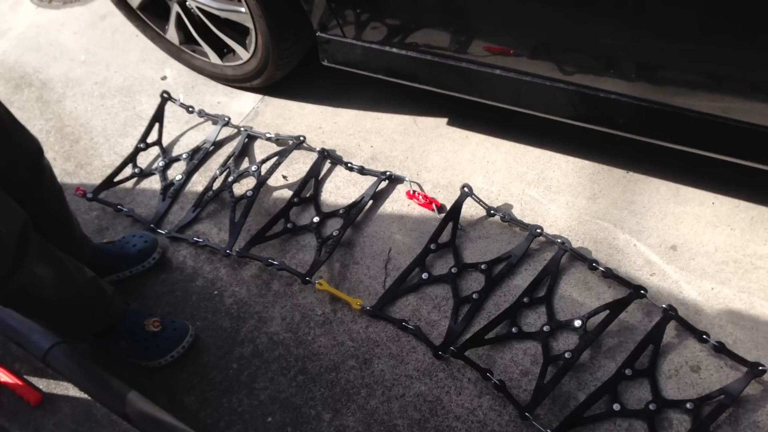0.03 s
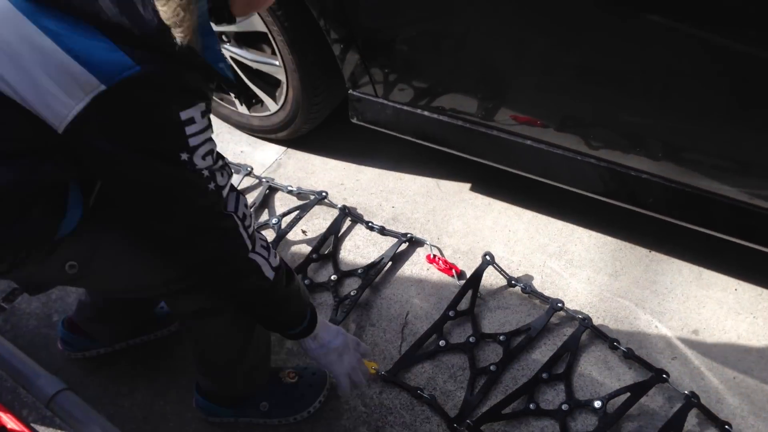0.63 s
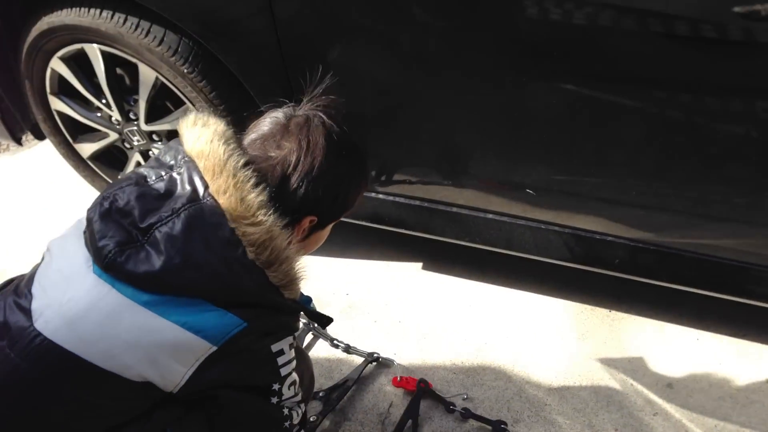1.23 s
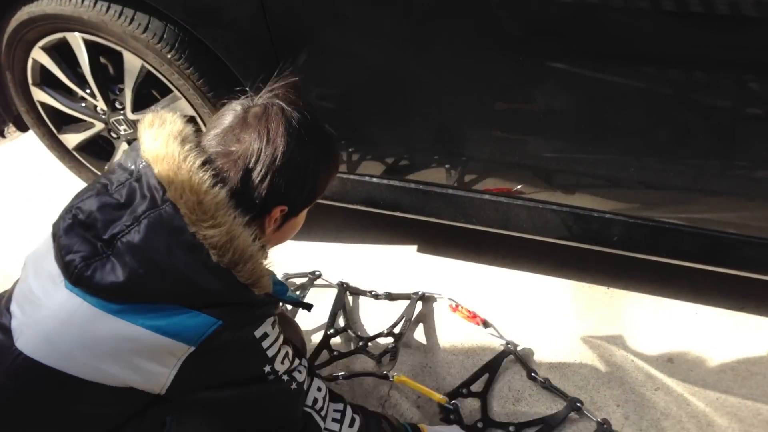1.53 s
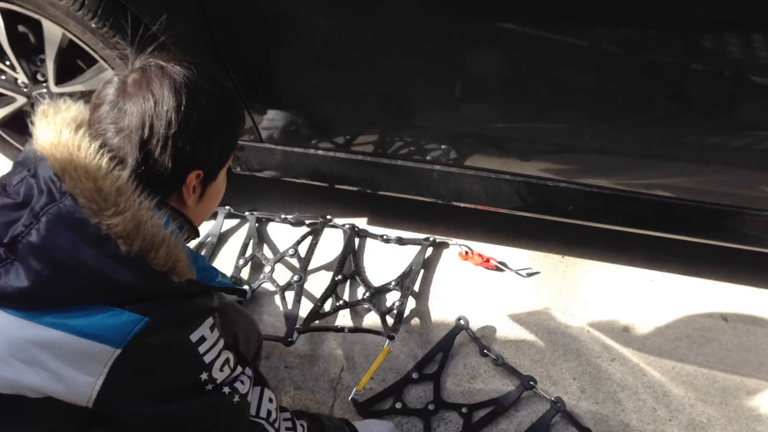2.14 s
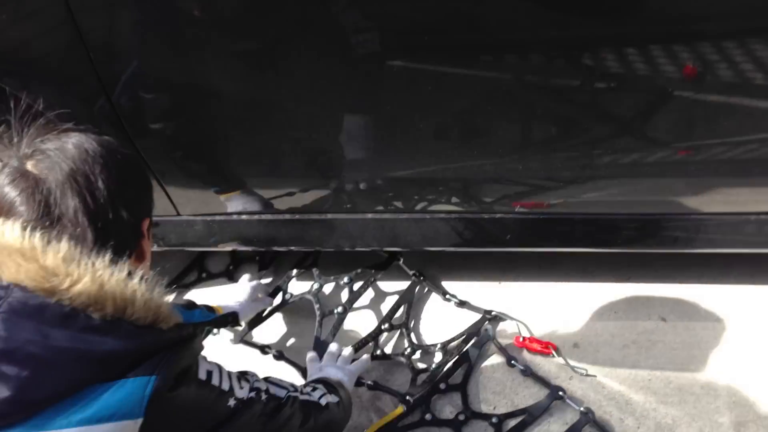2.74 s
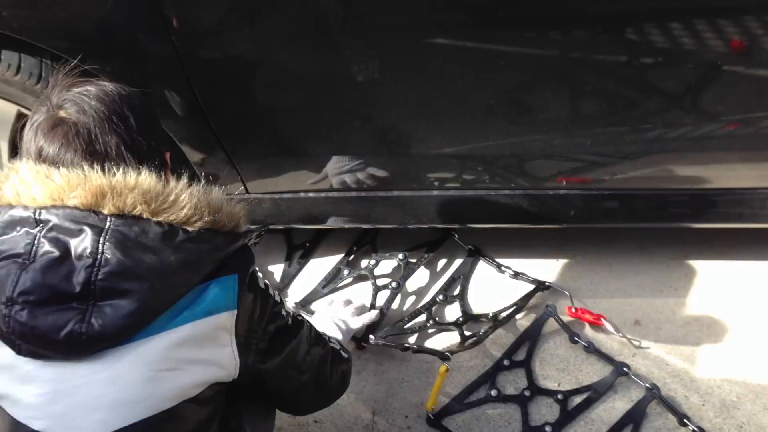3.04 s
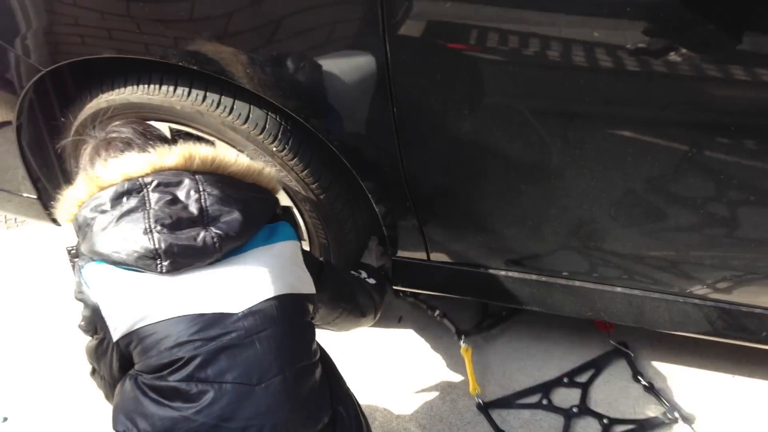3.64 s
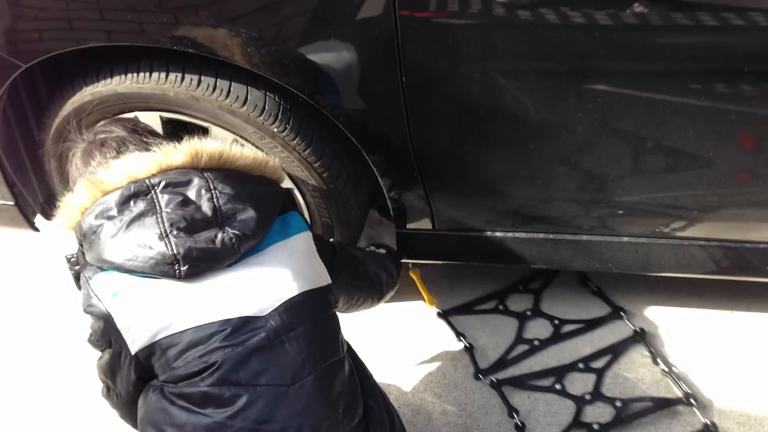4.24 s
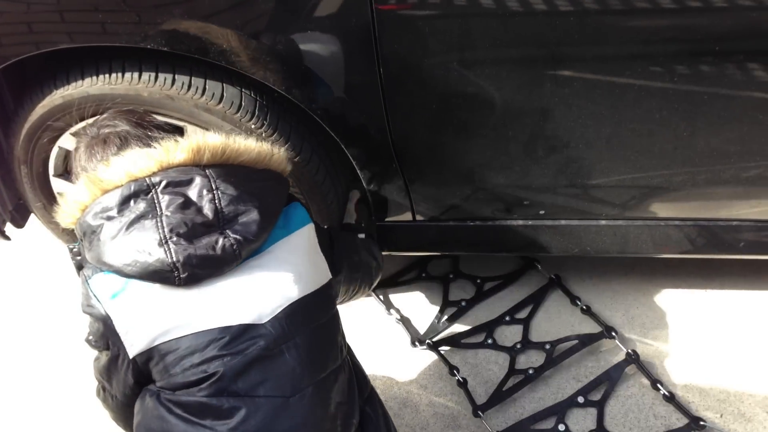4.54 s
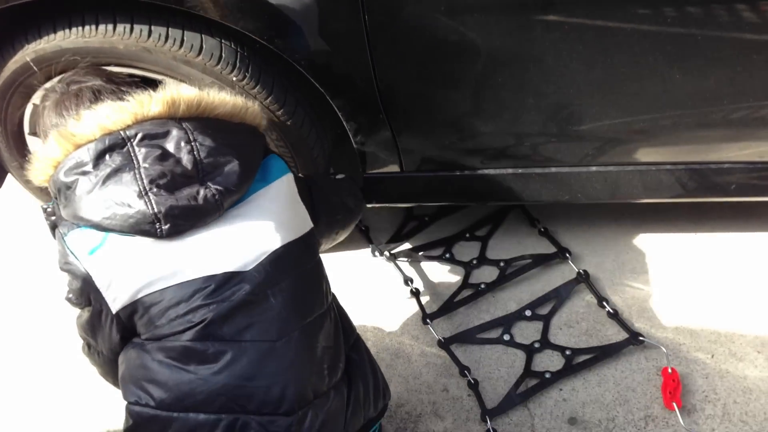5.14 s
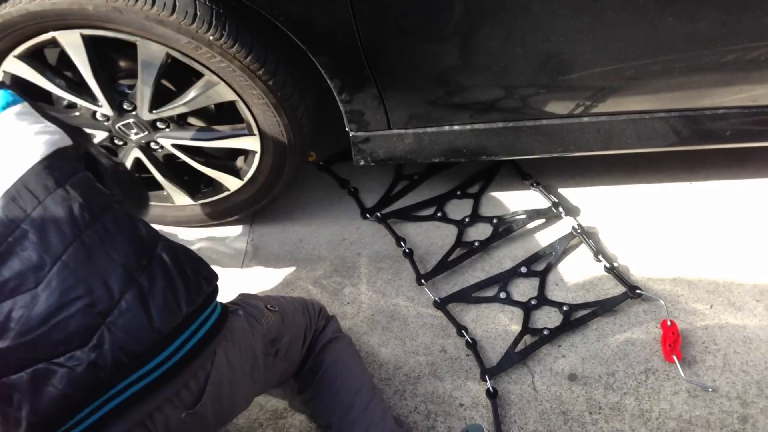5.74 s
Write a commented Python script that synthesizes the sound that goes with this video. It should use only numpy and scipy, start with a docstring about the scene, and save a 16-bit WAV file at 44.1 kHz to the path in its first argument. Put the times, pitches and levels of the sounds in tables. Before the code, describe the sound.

A net-type tyre chain is tugged over pavement beside a parked car, scraping, clinking and jingling in short, irregular bursts outdoors.

```python
"""Outdoors, a net-type tyre chain is fed behind the wheel of a parked car. First the handler steps,
crouches and rustles in a padded jacket while a low hum fades. From about 1 s the net is pulled over the
pavement in short tugs: studs grind and snap off grit, links clink and sing, steel hooks ring. After 5 s
the pulling stops, leaving a last snap, a scuff and the street's hush. Throughout, the ground and the
car's side throw the handling sounds back."""
import sys
import numpy as np
from scipy import signal
from scipy.fft import rfft, irfft
from scipy.io import wavfile

SR = 44100
rng = np.random.default_rng(int(sys.argv[2]) if len(sys.argv) > 2 else 0)


def log_audio(samples):
    """Write samples as a 16-bit WAV file to the path given in sys.argv[1]."""
    # one column per channel
    frames = np.atleast_2d(samples).T
    # limit to full scale, then quantise
    limited = np.clip(frames, -1, 1)
    pcm = np.round(limited * 32767).astype(np.int16)
    wavfile.write(sys.argv[1], SR, pcm)


N = 260190
TIME = np.arange(N) / SR

# EQ of the studs' bright scrape and of their low grind: f/Hz, level/dB
SCRAPE_EQ = [(500, -50), (1500, -7.5), (2250, -4.5), (2600, 3), (3400, -2), (4400, 1.5), (5500, 1.5),
             (7000, -3), (8300, -6), (10500, -9.5), (12500, -13), (15500, -27)]
GRIND_EQ = [(60, -53), (150, -17), (420, -7.5), (700, 3.5), (1200, 1), (1850, 4), (2400, -1.5),
            (4000, -31.5), (12000, -14)]
def drag():
    """Studs catch and slip on rough ground: fine grains, sharp grit, a coarser grind, rattling links."""
    t = np.arange(SR // 20) / SR
    slip = judder(hz=70, depth_db=2.1)
    grit = gain_of(-3.5) * grains(per_s=150, spread_db=1.5)
    scrape = unit_rms(colour(grains(per_s=8200, spread_db=2.5) + grit, SCRAPE_EQ))
    grind = unit_rms(colour(grains(per_s=6000, spread_db=3.5), GRIND_EQ))
    clinks = [link_clink(t, hz) for hz in np.geomspace(2600, 7200, 90)]
    rattle = scatter(clinks, per_s=190, spread_db=1.8)
    scrape_gain, grind_gain, rattle_gain = (pull_envelope(layer) for layer in range(3))
    return slip * (scrape_gain * scrape + grind_gain * grind) + rattle_gain * rattle


# tugs that slide the net: t/s, length/s, scrape level/dB, grind level/dB, rattle level/dB
PULLS = [(0.996, 0.21, -53, -60, -52), (1.139, 0.15, -45.5, -60.5, -43.5), (1.325, 0.16, -43.5, -64, -44),
         (1.424, 0.16, -43.5, -49.5, -44.5), (1.551, 0.097, -37.5, -47, -47),
         (1.674, 0.15, -48.5, -56.5, -67), (1.844, 0.054, -49.5, -54.5, -49),
         (1.925, 0.06, -51.5, -58, -55.5), (2.005, 0.12, -57, -54.5, -53.5), (2.08, 0.19, -51, -55.5, -52),
         (2.183, 0.13, -42.5, -50, -41), (2.305, 0.17, -53, -59, -55.5), (2.503, 0.27, -51.5, -60.5, -53.5),
         (2.802, 0.26, -55, -60, -61), (3.111, 0.068, -46, -60.5, -50.5), (3.202, 0.061, -55.5, -63, -53),
         (3.277, 0.443, -48, -54, -56.5), (3.491, 0.26, -45.5, -56.5, -63),
         (3.72, 0.15, -54.5, -58.5, -54.5), (4.138, 0.085, -61, -58.5, -56.5),
         (4.188, 0.29, -47, -56.5, -60), (4.519, 0.16, -55.5, -59, -54.5), (4.904, 0.27, -59, -56.5, -55.5),
         (5.243, 0.07, -67, -64, -63)]
def pull_envelope(layer, attack_s=0.026, release_s=0.025, swell_db=2):
    """Gain of one drag layer: each pull takes up, swells and slides to rest; overlaps add in power."""
    power, t = np.zeros(N), np.arange(SR * 3 // 4) / SR
    for start, length, *layer_db in PULLS:
        take_up = np.minimum(t / attack_s, 1)
        arch = np.sin(np.pi * np.minimum(t / length, 1)) - 2 / np.pi
        release = np.exp(-np.maximum(t - length, 0) / release_s)
        add(power, start, (gain_of(layer_db[layer] + swell_db * arch) * take_up * release) ** 2)
    return np.sqrt(power)


# modes of a link, damped by the rubber net: f/Hz, level/dB, t60/s
LINK_MODES = [(1985, -9, 0.016), (2654, 5, 0.032), (2810, 2.5, 0.024), (3290, 2.5, 0.014),
              (3494, 5.5, 0.02), (3820, 6, 0.012), (4297, 5.5, 0.023), (4880, -1.5, 0.012),
              (5950, -5.5, 0.035), (6600, -9.5, 0.033), (7020, -4, 0.026)]
def link_clink(t, hz, detune=0.019, fall_db_per_octave=9.5, note_t60_cycles=66):
    """One clink: a main note, longer when low, over the link's modes, which fall away from that note."""
    f, db, t60 = np.transpose(LINK_MODES)[:, :, None]
    tune, strength, phase = rng.standard_normal((3, len(LINK_MODES), 1))
    struck_db = db + 2.4 * strength - fall_db_per_octave * abs(np.log2(f / hz))
    own_hz = f * (1 + detune * tune)
    modes = gain_of(struck_db - 60 * t / t60) * np.sin(2 * np.pi * (own_hz * t + phase))
    note = np.sin(2 * np.pi * hz * t) * gain_of(-0.5 - 60 * t * hz / note_t60_cycles)
    return modes.sum(0) / np.linalg.norm(gain_of(struck_db)) + note


# EQ on the chain's hard hits, clacks and snaps alike: f/Hz, level/dB
IMPACT_EQ = [(200, -34), (1000, -6.5), (1900, 6.5), (2250, -8), (2600, -2.5), (7200, 0.5), (8300, -5.5),
             (10000, -4), (12200, -9), (14300, -1)]
# links hitting the ground and each other: t/s, pre-EQ level/dB, main note f/Hz
CLACKS = [(1.0586, -33.5, 3520), (1.1731, -30, 3640), (1.1884, -33, 6900), (1.24, -32, 2910),
          (1.2468, -29.5, 7050), (1.259, -32, 3100), (1.283, -35, 2760), (1.317, -32, 3970),
          (1.3406, -28.5, 5940), (1.345, -27, 4550), (1.393, -32.5, 3420), (1.4491, -30, 3580),
          (1.62, -33, 5700), (1.635, -33.5, 4930), (1.6828, -31.5, 2860), (1.705, -32, 2670),
          (1.7292, -30.5, 2760), (1.7445, -33.5, 2750), (1.771, -46, 2920), (1.7954, -41.5, 2830),
          (1.9585, -40.5, 2105), (2.0873, -26, 3880), (2.0936, -26, 6180), (2.3806, -37, 6970),
          (2.5908, -36, 2840), (2.6185, -36.5, 4300), (2.637, -40, 4350), (2.6497, -30.5, 3320),
          (2.66, -38.5, 3480), (2.676, -33, 3560), (2.6856, -32, 3080), (2.6938, -40, 3040),
          (2.712, -34, 2950), (2.8531, -26.5, 4710), (2.917, -32, 4450), (3.35, -33.5, 3040),
          (3.3633, -42, 2970), (3.5, -30.5, 2550), (3.5368, -32.5, 4260), (3.5932, -31, 2830),
          (3.622, -29, 4360), (3.6386, -32.5, 5240), (3.7138, -30, 3330), (4.2512, -30.5, 2675),
          (4.2729, -31.5, 3420), (4.33, -28, 3880), (4.351, -31, 3000), (4.381, -34, 4600),
          (4.3956, -27.5, 3840), (4.4215, -37, 4530), (4.447, -39, 4500), (4.668, -40, 4270),
          (4.9598, -40, 2880), (5.1234, -35, 3220), (5.1784, -47, 3400), (5.2182, -50.5, 3300)]
def link_clacks(body_hz=4600, rise_s=0.00072, buzz_s=0.0051, settle_t60=0.087):
    """A link rolls into contact: it clinks, buzzes briefly against the ground and settles."""
    out, t = np.zeros(N), np.arange(SR // 8) / SR
    for s, db, hz in CLACKS:
        contact = gain_of(-13) * np.exp(-(t / buzz_s) ** 2) + gain_of(-24 - 60 * t / settle_t60)
        buzz = noise_band(len(t), np.sqrt(hz * body_hz), octaves=0.74) * contact
        blow = (link_clink(t, hz) + buzz) * (1 - np.exp(-t / rise_s))
        add(out, s, gain_of(db) * blow / np.std(blow[:SR // 200]))  # the first 5 ms set the level
    return colour(out, IMPACT_EQ)


# cracks of studs on grit: t/s, pre-EQ level/dB, centre f/Hz
SNAPS = [(1.261, -20, 5060), (1.4515, -26, 4500), (1.479, -21.5, 4400), (1.4895, -20.5, 4900),
         (1.5662, -14, 4700), (1.665, -26, 4800), (2.0873, -13, 4830), (2.2687, -17.5, 4720),
         (2.275, -19, 4450), (2.3062, -19.5, 4170), (3.1072, -31.5, 4570), (3.5644, -18.5, 4800),
         (4.667, -24.5, 4300), (5.065, -34, 4800), (5.1135, -37, 9000), (5.518, -43, 4440)]
def stud_snaps(crumbs_t60=0.03):
    """A stud jumps off a grain of grit: a crack with hardly any ring and a crumbly tail."""
    out, t = np.zeros(N), np.arange(SR // 20) / SR
    for s, db, hz in SNAPS:
        crack = knock(t, hz, octaves=0.99, t60=0.0068, count=14)
        crumbs = noise_band(len(t), hz, octaves=0.7) * gain_of(-22 - 60 * t / crumbs_t60)
        add(out, s, gain_of(db) * (crack + crumbs))
    return colour(out, IMPACT_EQ)


# jolts to the steel hooks: t/s, level/dB, overtone f/Hz
HOOK_JOLTS = [(1.062, -42, 6600), (1.173, -39, 6900), (1.304, -49, 13900), (1.341, -41, 14300),
              (1.706, -43, 14000), (1.73, -43, 9260), (2.088, -44, 14350), (2.676, -47, 9330),
              (2.714, -45, 9330), (2.854, -37, 6560), (3.138, -51, 9290), (3.594, -48, 9240),
              (3.639, -37, 6510), (3.715, -37, 4260), (3.796, -44, 9130), (4.272, -43.5, 6500),
              (4.331, -37, 6580), (4.45, -42.5, 9450), (5.124, -44, 14240), (5.18, -55, 9260)]
def hook_jingle(overtone_t60=0.098, modes_db=-2.5, shake_db=-11, shake_decay_s=0.048):
    """A jolted hook sings on one overtone above its modes and sets its loose neighbours tapping."""
    t, shake_t = np.arange(SR // 4) / SR, np.arange(SR // 2) / SR
    taps = scatter([hook_ring(t, sustain=0.6) for _ in range(60)], per_s=160, spread_db=3)
    rings, shake = np.zeros((2, N))
    for s, db, hz in HOOK_JOLTS:
        overtone = np.sin(2 * np.pi * hz * t) * gain_of(-60 * t / overtone_t60)
        modes = gain_of(modes_db) * hook_ring(t, looseness=0.87)
        add(rings, s, gain_of(db) * (overtone + modes))
        add(shake, s, gain_of(db + shake_db) * np.exp(-shake_t / shake_decay_s))
    chatter = judder(hz=220, depth_db=2)  # ringing hooks buzz against the net
    return (rings + shake * taps) * chatter


# modes of a steel hook: f/Hz, level/dB, t60/s
HOOK_MODES = [(2515, 0.5, 0.046), (2800, -17, 0.19), (6500, -8, 0.17), (6740, -22, 0.041), (9600, -9, 0.2),
              (9510, -7, 0.05), (10670, -19, 0.15), (14000, -9, 0.1)]
def hook_ring(t, looseness=1, sustain=1):
    """One hook rings; no two are tuned alike, and each tap favours other modes."""
    hz, db, t60 = np.transpose(HOOK_MODES)[:, :, None]
    tune, strength = looseness * rng.standard_normal((2, len(HOOK_MODES), 1))
    own_hz = hz * (1 + 0.009 * tune)
    decay = gain_of(db + 3.5 * strength - 60 * t / (t60 * sustain))
    return (decay * np.sin(2 * np.pi * own_hz * t)).sum(0)


# EQ of skidding steel, all top end: f/Hz, level/dB
GLINT_EQ = [(6000, -45), (8600, -6), (9300, 4.5), (10700, 3.5), (12000, -7.5), (13400, -10), (14250, -8),
            (15200, -25)]
# short bright skids: t/s, level/dB
GLINTS = [(1.174, -45), (1.342, -36.5), (1.705, -35.5), (1.985, -50), (2.089, -34.5), (2.853, -37),
          (3.696, -36.5), (4.275, -41.5), (4.29, -41), (4.3265, -38), (4.417, -39.5), (5.0152, -45),
          (5.028, -50), (5.062, -41), (5.113, -40.5), (5.147, -43)]
def steel_glints(t60=0.05):
    """Steel skids on steel: a flash of friction that lights up the highest modes."""
    out, t = np.zeros(N), np.arange(SR // 12) / SR
    for s, db in GLINTS:
        skid = unit_rms(colour(rng.standard_normal(len(t)), GLINT_EQ))
        add(out, s, gain_of(db - 60 * t / t60) * skid)
    return out


# links singing as they slide on a neighbour: t/s, length/s, level/dB, start f/Hz, end f/Hz
SLIDES = [(1.19, 0.09, -47.5, 2810, 2850), (1.35, 0.115, -46, 2600, 2585), (1.58, 0.172, -45.5, 2580, 2595),
          (1.68, 0.112, -45.5, 2790, 2870), (2.565, 0.08, -52, 2840, 2830),
          (2.621, 0.024, -47.5, 4450, 4430), (2.65, 0.07, -41, 3400, 2950), (2.714, 0.05, -49, 2640, 2570),
          (4.335, 0.048, -45, 6600, 6650)]
def link_slides(mode_width_hz=29, edge_s=0.013):
    """Tiny slips keep one mode ringing; its note glides as the contact moves along the link."""
    out, t = np.zeros(N), np.arange(SR // 3) / SR
    for s, length, db, start_hz, end_hz in SLIDES:
        width_hz = mode_width_hz + abs(start_hz - end_hz)  # a wide glide is rougher
        pole = np.exp(-np.pi * width_hz / SR)
        slips = rng.standard_normal(len(t)) + 1j * rng.standard_normal(len(t))
        ring = signal.lfilter([1 - pole], [1, -pole], slips)
        compressed = ring / np.sqrt(abs(ring))
        cycles = np.cumsum(np.interp(t, [0, length], [start_hz, end_hz])) / SR
        tone = unit_rms((compressed * np.exp(2j * np.pi * cycles)).real)
        contact = (1 - np.exp(-t / edge_s)) * np.exp(-np.maximum(t - length, 0) / edge_s)
        add(out, s, gain_of(db) * contact * tone)
    return out


# dull bumps of feet, hands and rubber net: t/s, peak level/dB, centre f/Hz
THUMPS = [(0.273, -51, 264), (0.637, -38.5, 231), (0.642, -38.5, 765), (0.99, -43.5, 580),
          (1.675, -43, 285), (2.185, -37.5, 243), (2.413, -42, 282), (2.929, -38, 1040),
          (3.366, -43.5, 464), (3.512, -46.5, 194), (3.93, -42, 270), (4.021, -52, 302), (4.95, -45, 337),
          (5.564, -53.5, 238)]
def thumps(t60_cycles=14):
    """Soft, heavy contacts: a few low modes with a rounded attack and a quick decay."""
    out, t = np.zeros(N), np.arange(SR // 5) / SR
    for s, db, hz in THUMPS:
        bump = knock(t, hz, octaves=0.95, t60=t60_cycles / hz, count=9) * (1 - np.exp(-t * hz))
        add(out, s, gain_of(db) * unit_peak(bump))
    return out


# rubs and ticks: peak t/s, level/dB, centre f/Hz, width/octaves, decay/s
SCUFFS = [(0.208, -45.5, 3340, 3.2, 0.027), (0.314, -48, 4800, 1, 0.0019), (0.383, -44, 3570, 0.84, 0.014),
          (0.385, -42.5, 1100, 0.2, 0.0087), (0.548, -46.5, 2850, 0.49, 0.0012),
          (0.611, -49, 3900, 1.06, 0.0087), (0.641, -41.5, 890, 0.45, 0.011),
          (0.6844, -43, 4800, 0.95, 0.0038), (0.714, -44.5, 5950, 0.79, 0.0032),
          (0.949, -46.5, 1100, 1.2, 0.0018), (0.992, -46, 1150, 0.65, 0.0036),
          (2.459, -42, 1490, 0.34, 0.0082), (3.354, -37, 1850, 0.15, 0.011),
          (3.929, -50, 3330, 0.57, 0.017), (4.024, -48.5, 2840, 0.95, 0.018),
          (4.791, -45.5, 3540, 0.59, 0.0088), (4.887, -49, 1620, 1.2, 0.014),
          (5.491, -54.5, 3680, 1.4, 0.019), (5.562, -51.5, 1040, 0.44, 0.0035)]
def scuffs(rise_share=1 / 8):
    """Soles, gloves, rubber and links rub: noise that swells fast to a peak and dies away."""
    out, t = np.zeros(N), np.arange(-SR // 10, SR // 4) / SR
    for s, db, hz, octaves, decay in SCUFFS:
        stroke = np.exp(-abs(t) / np.where(t < 0, rise_share * decay, decay))
        add(out, s + t[0], gain_of(db) * stroke * noise_band(len(t), hz, octaves))
    return out


# EQ of folding padded cloth: f/Hz, level/dB
CLOTH_EQ = [(30, -24), (80, -40), (130, -8.5), (190, 1), (300, 4), (450, -6), (800, -4), (3000, -12.5),
            (12000, -33)]
# fader ride for the shifting jacket and net: t/s, level/dB
RUSTLE_RIDE = [(0.1, -74), (0.26, -56), (0.5, -59.5), (0.85, -63), (1.15, -61), (1.95, -87), (2.25, -60.5),
               (2.8, -67), (3.35, -59.5), (4.1, -65), (4.95, -64.5), (5.9, -81)]
def jacket_rustle():
    """Padded cloth and rubber shift with a low, lumpy rustle and a smoother swish."""
    folds = unit_rms(colour(rng.standard_normal(N), CLOTH_EQ)) * judder(hz=39.4, depth_db=6)
    swish = noise_band(N, hz=3000, octaves=1.1) * judder(hz=25, depth_db=3.5)
    return fader(RUSTLE_RIDE) * (gain_of(-1.5) * folds + gain_of(-5) * swish)


def with_reflections(x, near_db=-9, far_db=-15, near_t60=0.084, far_t60=0.18, echoes_per_s=2500):
    """Adds quick echoes off the ground and the car door, then a faint outdoor tail."""
    t = np.arange(SR // 2) / SR
    near, far = rng.standard_normal((2, len(t))) * (rng.random((2, len(t))) < echoes_per_s / SR)
    near = near * (t > 0.001) * gain_of(-60 * t / near_t60)
    far = far * (t > 0.012) * gain_of(-60 * t / far_t60)
    echoes = gain_of(near_db) * near / np.linalg.norm(near) + gain_of(far_db) * far / np.linalg.norm(far)
    return x + signal.oaconvolve(x, echoes)[:N]


# EQ of the outdoor bed: f/Hz, level/dB
STREET_EQ = [(30, -38), (80, -32), (150, -2.5), (300, -0.5), (450, -6.5), (800, -12), (1600, -15),
             (5000, -18), (14000, -21), (16000, -24)]
# fader ride for a low hum nearby: t/s, level/dB
HUM_RIDE = [(0.08, -64), (0.25, -62.5), (0.9, -68), (1.1, -84)]
def street(hush_db=-62, hum_hz=145.5):
    """Steady outdoor hush, with a wavering hum that is gone after about a second."""
    hush = gain_of(hush_db) * unit_rms(colour(rng.standard_normal(N), STREET_EQ))
    waver = judder(hz=8, depth_db=1.3)
    return hush + fader(HUM_RIDE) * waver * unit_rms(np.sin(2 * np.pi * hum_hz * TIME))


def knock(t, hz, octaves, t60, count):
    """A cluster of heavily damped modes around hz; every blow strikes other ones."""
    place, size, life = rng.random((3, count, 1))
    offset = 2 * (np.arange(count)[:, None] + place) / count - 1
    f = np.minimum(hz * 2 ** (octaves * offset), SR / 2)
    weight = np.hanning(count + 2)[1:-1, None] * np.sign(size - 0.5) * (0.14 + abs(size - 0.5))
    decay = gain_of(-60 * t / (t60 * (0.5 + life)))
    return unit_peak((weight * np.sin(2 * np.pi * f * t) * decay).sum(0))


def grains(per_s, spread_db):
    """Random clicks of either sign; a few are much larger than the rest."""
    size = gain_of(spread_db * np.minimum(rng.exponential(1, N), 4))
    return unit_rms(size * rng.choice([-1, 1], N) * (rng.random(N) < per_s / SR))


def scatter(sounds, per_s, spread_db):
    """Triggers sounds picked at random, at random moments and levels; rms 1."""
    out = np.zeros(N)
    for when, pick, size in rng.random((int(per_s * N / SR), 3)):
        gain = gain_of(-spread_db * np.log(1.02 - size))
        add(out, when * N / SR, gain * sounds[int(pick * len(sounds))])
    return unit_rms(out)


def judder(hz, depth_db):
    """A gain that wanders at random, at rates around hz."""
    f = np.fft.rfftfreq(N, 1 / SR)
    wander = unit_rms(irfft(rfft(rng.standard_normal(N)) * (f / hz) * np.exp(-f / hz), N))
    return unit_rms(gain_of(depth_db * wander))


def noise_band(samples, hz, octaves):
    """Noise in a bell-shaped band around hz; rms 1."""
    f = np.fft.rfftfreq(samples, 1 / SR) + 1
    bell = np.exp(-0.5 * (np.log2(f / hz) / octaves) ** 2)
    return unit_rms(irfft(rfft(rng.standard_normal(samples)) * bell, samples))


def colour(x, eq):
    """Minimum-phase EQ, so that clicks stay sharp."""
    f, db = np.transpose(eq)
    hz = abs(np.fft.fftfreq(4096, 1 / SR))
    log_gain = np.log(gain_of(np.interp(np.log(hz + 1), np.log(f), db)))
    taps = np.fft.ifft(np.exp(np.conj(signal.hilbert(log_gain)))).real
    return signal.oaconvolve(x, taps[:len(taps) // 2])[:len(x)]


def fader(ride):
    """A dB curve as a gain, silent outside its span."""
    times, db = np.transpose(ride)
    return gain_of(np.interp(TIME, times, db, left=-120, right=-120))


def add(mix, s, sound):
    """Mixes a sound in at s seconds."""
    part = mix[max(round(s * SR), 0):][:len(sound)]
    part += sound[:len(part)]


def gain_of(db):
    """Decibels to amplitude."""
    return 10 ** (np.asarray(db) / 20)


def unit_rms(x):
    """Scales to rms 1."""
    return x / np.sqrt(np.mean(x ** 2) + 1e-20)


def unit_peak(x):
    """Scales to peak 1."""
    return x / (abs(x).max() + 1e-20)


def scene():
    """The chain and its handler beside the car, over the street bed; mono."""
    chain = drag() + link_slides() + hook_jingle() + steel_glints() + link_clacks() + stud_snaps()
    handler = thumps() + scuffs() + jacket_rustle()
    return (with_reflections(chain + handler) + street())[None]


def record(dry, low_cut_hz=90, high_cut_hz=15700, open_s=0.083, fade_s=0.003):
    """A small microphone with little bass opens after a moment; a steep high cut trims the top."""
    thin = signal.sosfilt(signal.butter(2, low_cut_hz, "high", fs=SR, output="sos"), dry)
    opened = thin * np.clip((TIME - open_s) / fade_s, 0, 1)
    high_cut = signal.firwin(255, high_cut_hz, window=("kaiser", 8), fs=SR)
    return signal.oaconvolve(opened, high_cut[None], "same")


dry = scene()
out = record(dry)
log_audio(out)
```